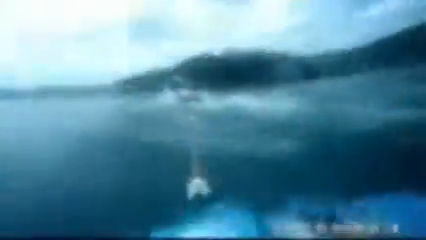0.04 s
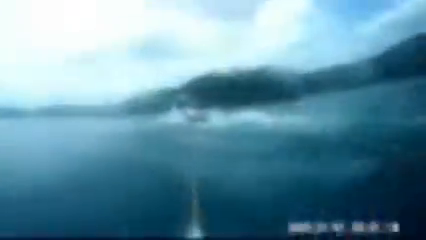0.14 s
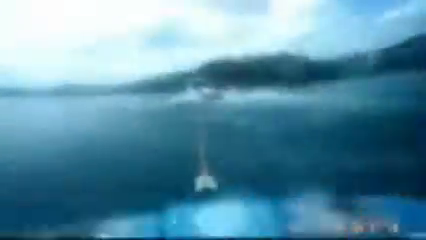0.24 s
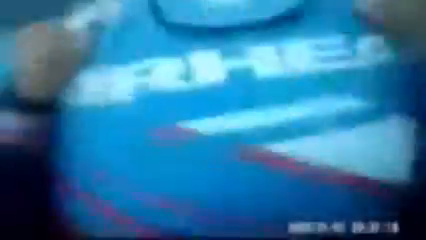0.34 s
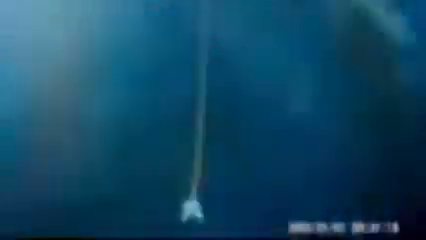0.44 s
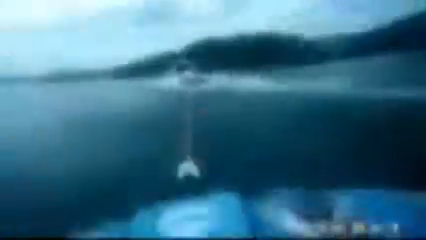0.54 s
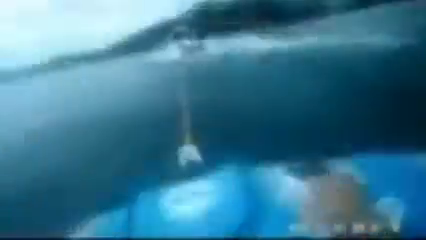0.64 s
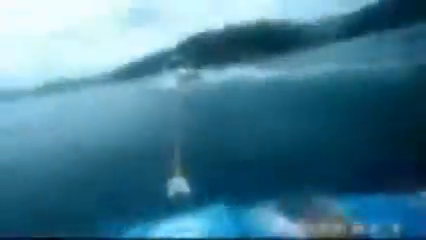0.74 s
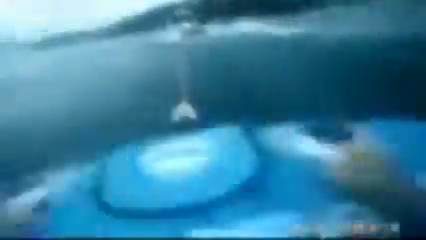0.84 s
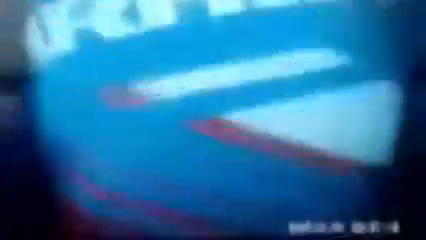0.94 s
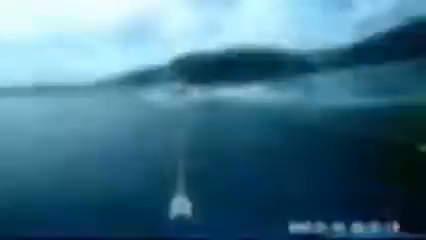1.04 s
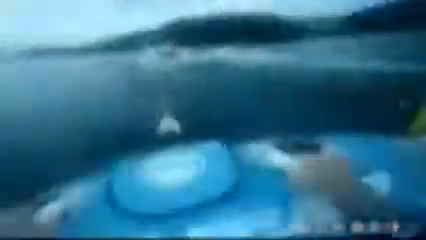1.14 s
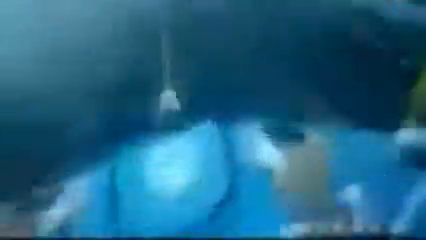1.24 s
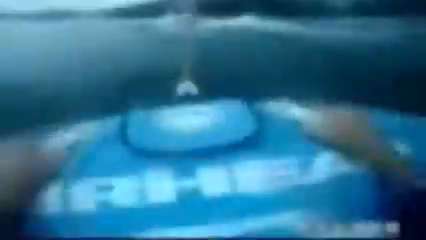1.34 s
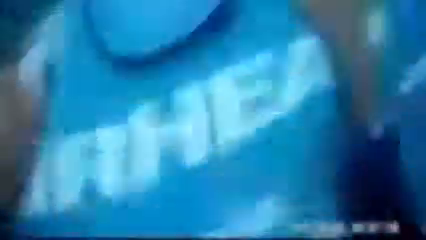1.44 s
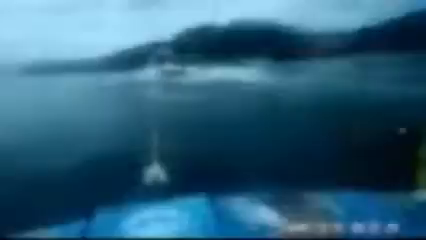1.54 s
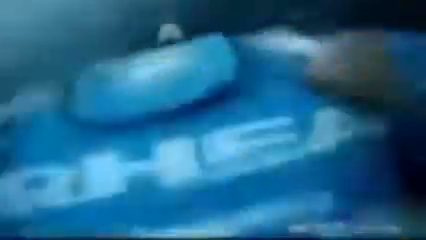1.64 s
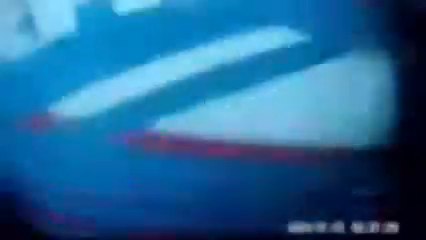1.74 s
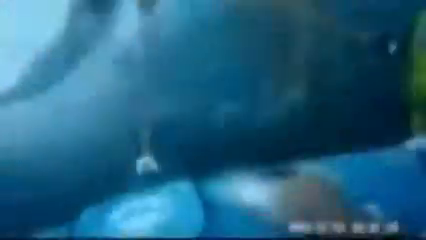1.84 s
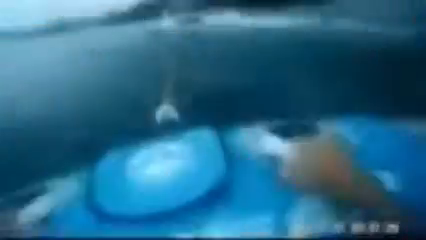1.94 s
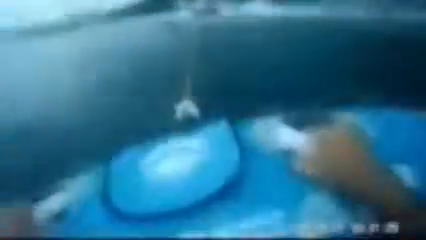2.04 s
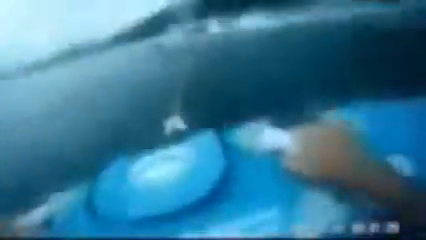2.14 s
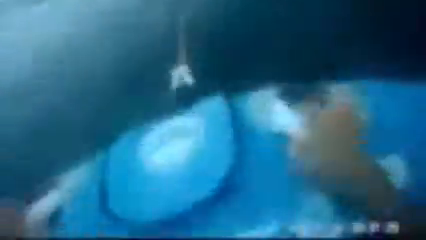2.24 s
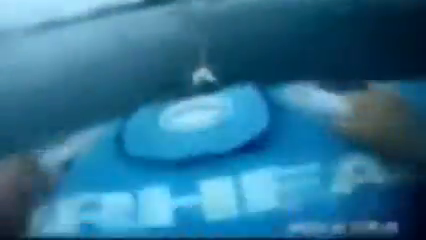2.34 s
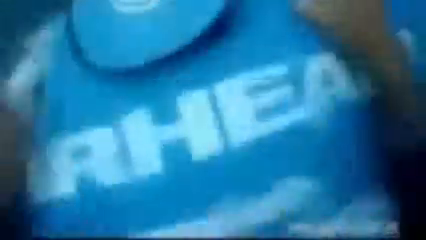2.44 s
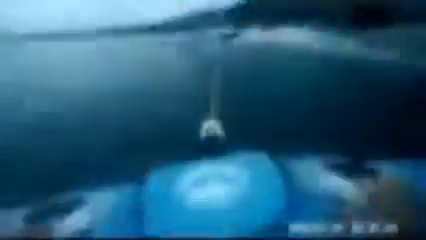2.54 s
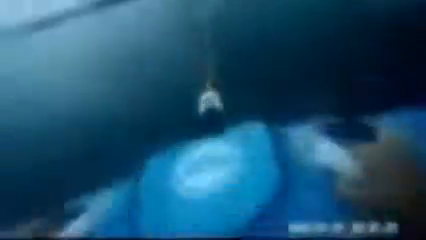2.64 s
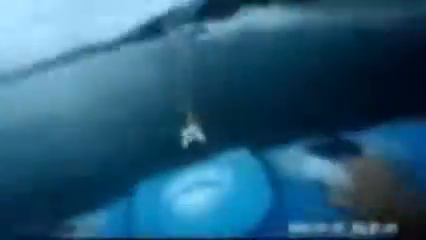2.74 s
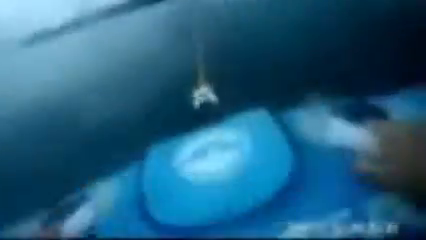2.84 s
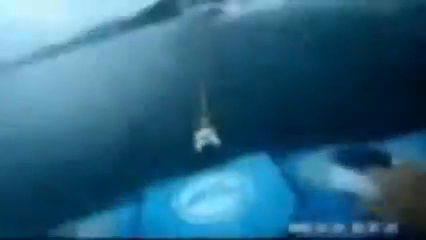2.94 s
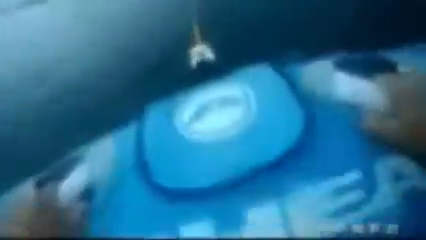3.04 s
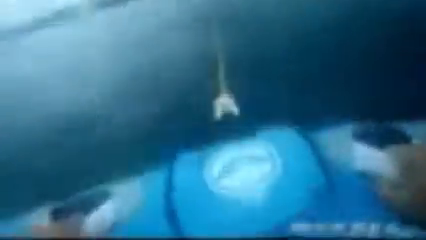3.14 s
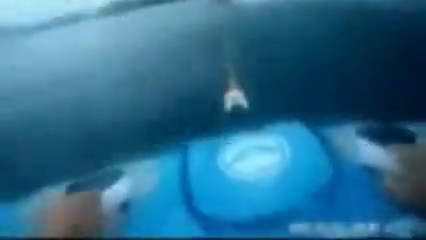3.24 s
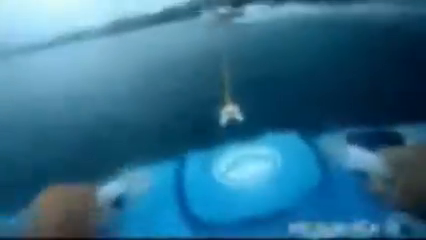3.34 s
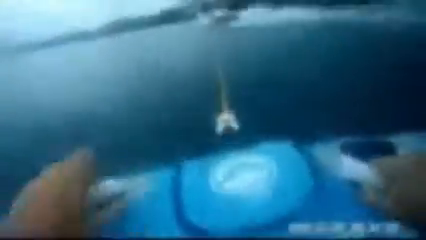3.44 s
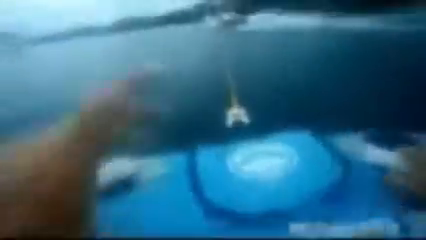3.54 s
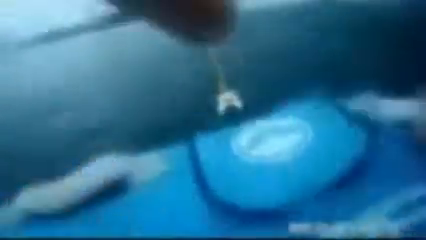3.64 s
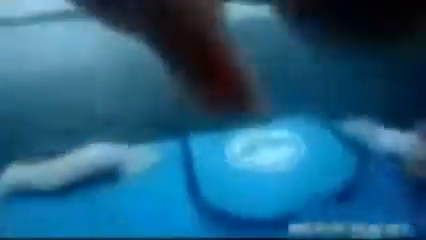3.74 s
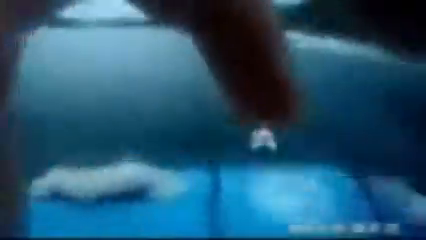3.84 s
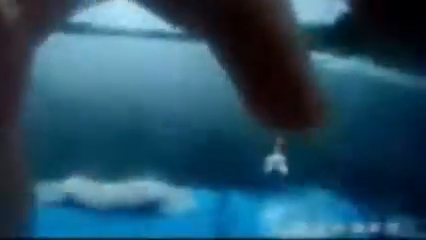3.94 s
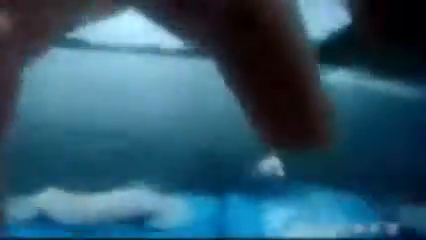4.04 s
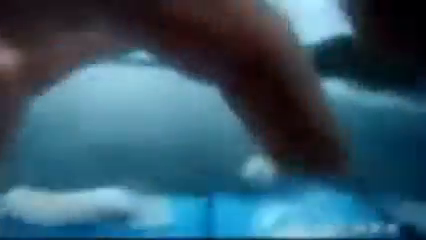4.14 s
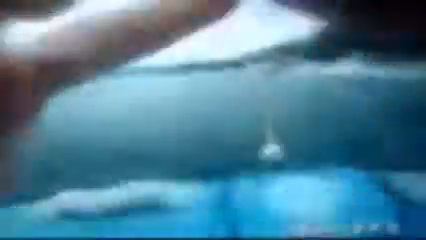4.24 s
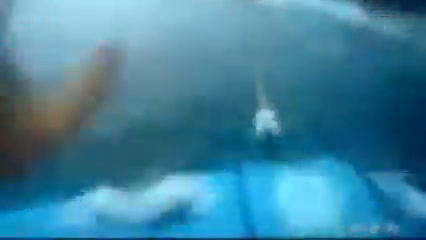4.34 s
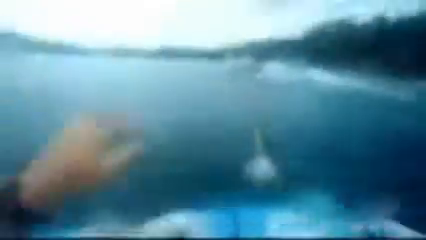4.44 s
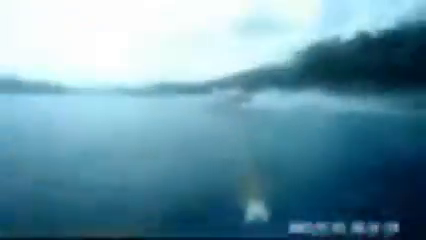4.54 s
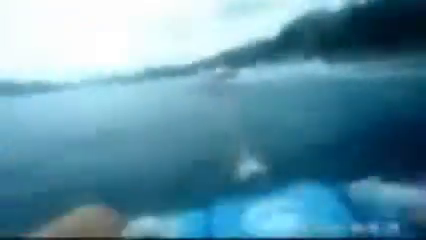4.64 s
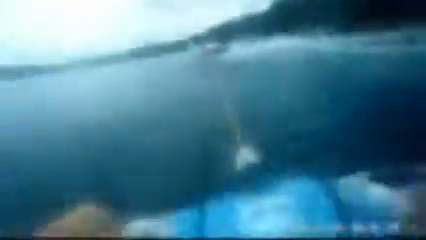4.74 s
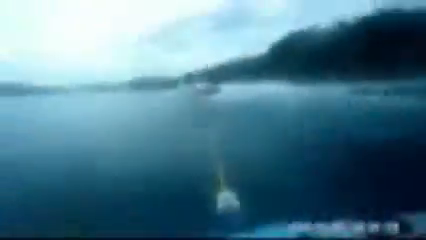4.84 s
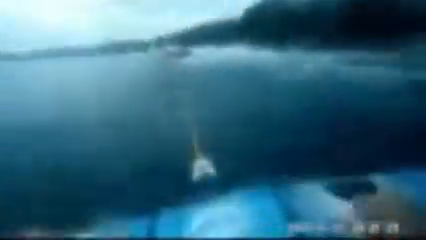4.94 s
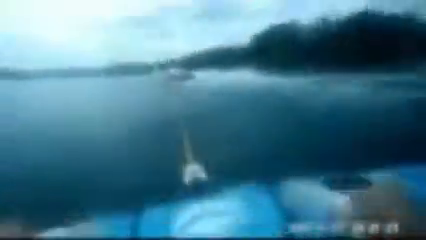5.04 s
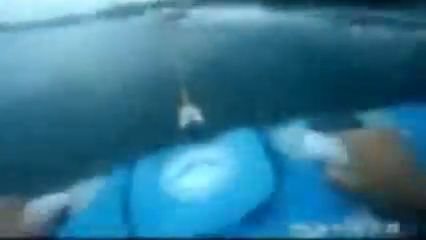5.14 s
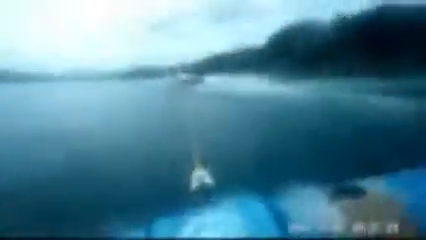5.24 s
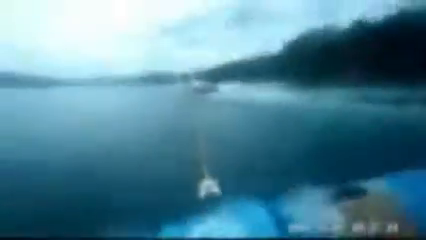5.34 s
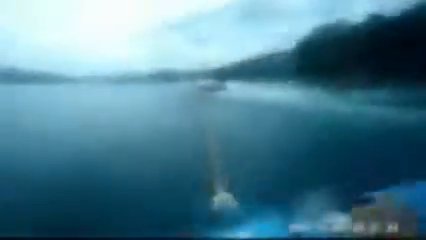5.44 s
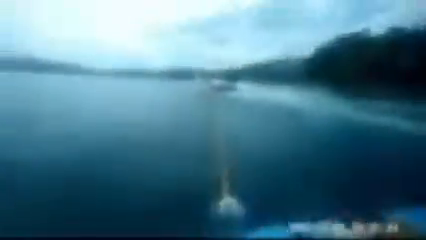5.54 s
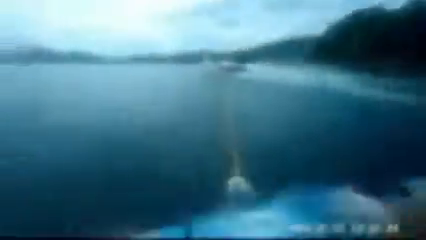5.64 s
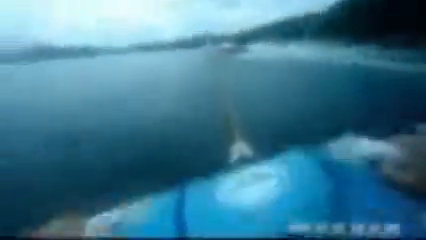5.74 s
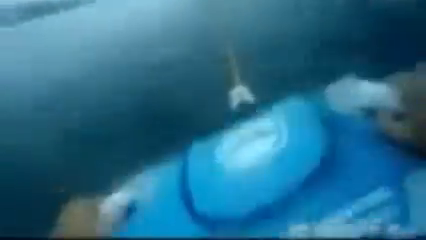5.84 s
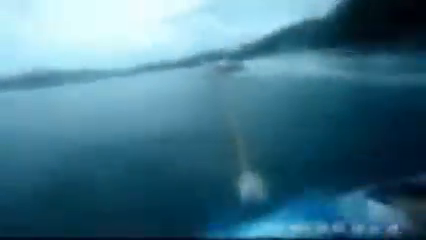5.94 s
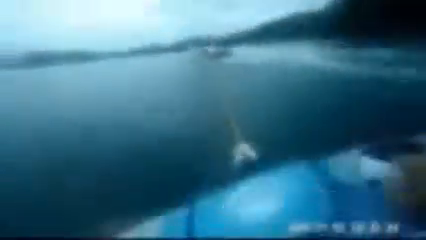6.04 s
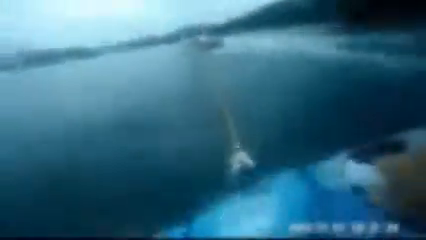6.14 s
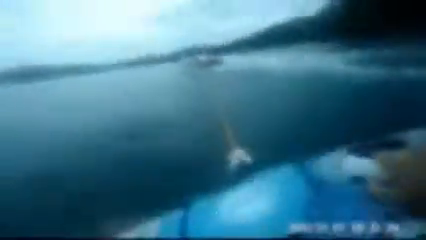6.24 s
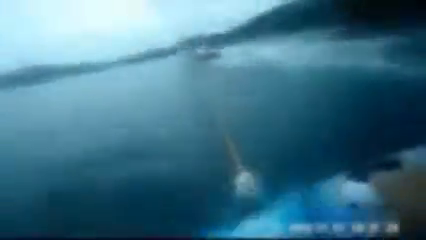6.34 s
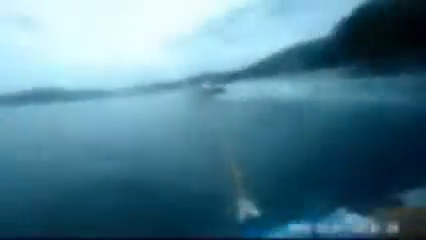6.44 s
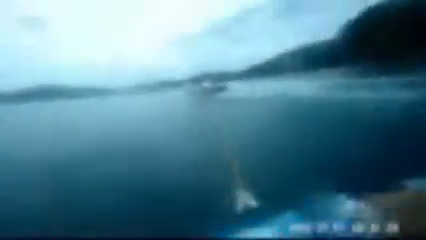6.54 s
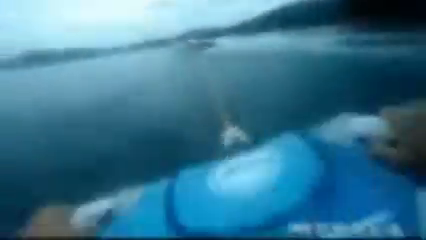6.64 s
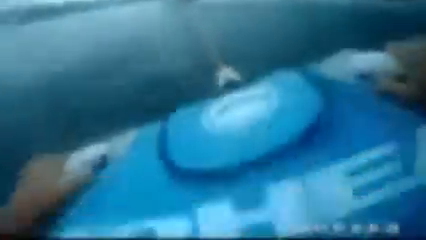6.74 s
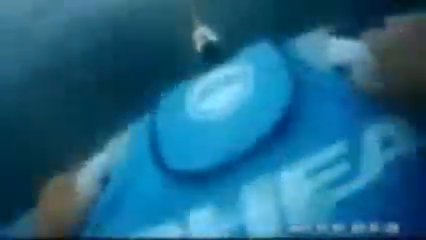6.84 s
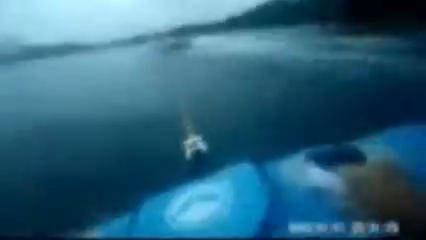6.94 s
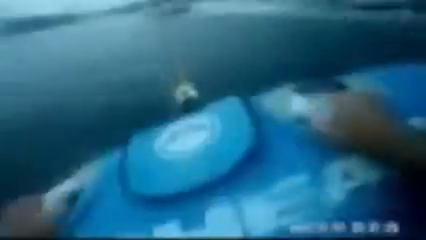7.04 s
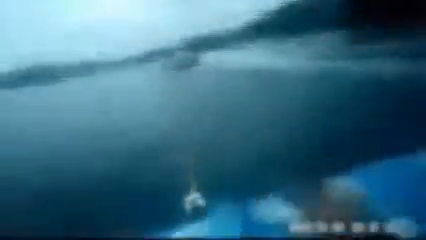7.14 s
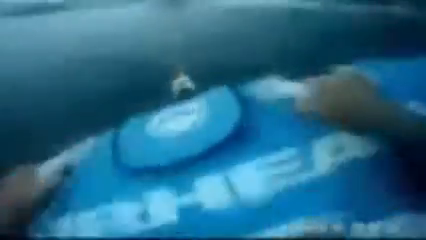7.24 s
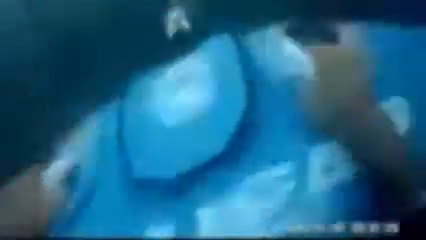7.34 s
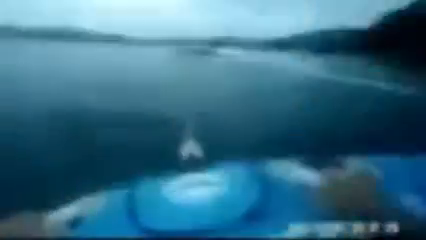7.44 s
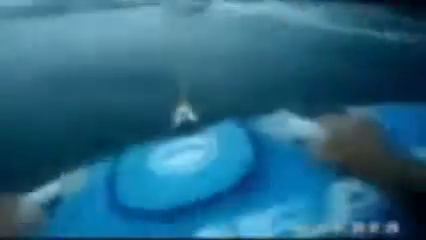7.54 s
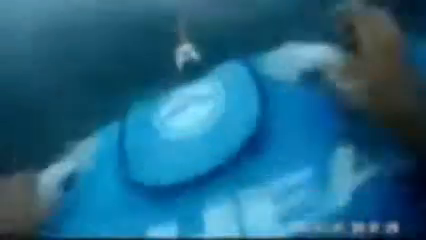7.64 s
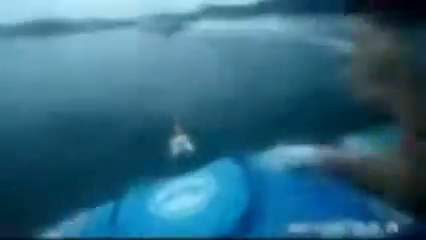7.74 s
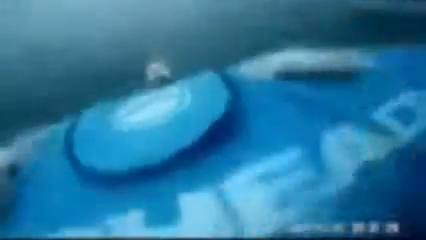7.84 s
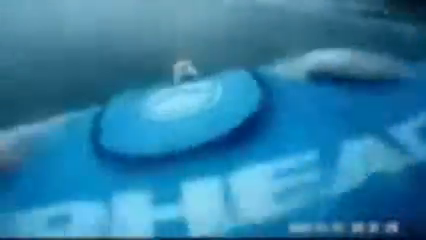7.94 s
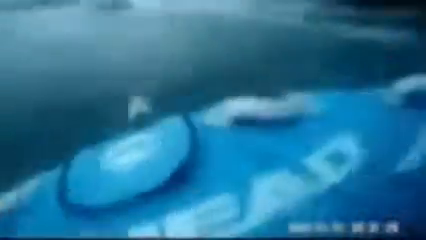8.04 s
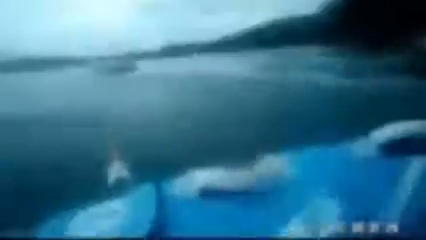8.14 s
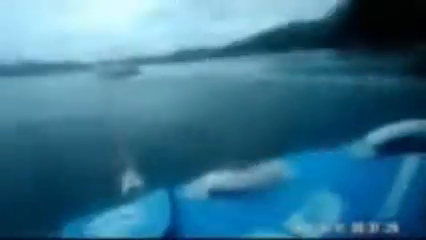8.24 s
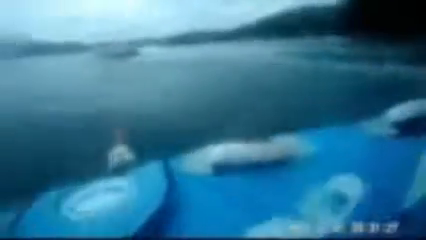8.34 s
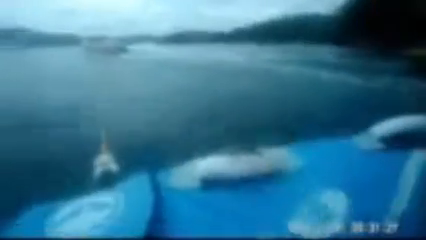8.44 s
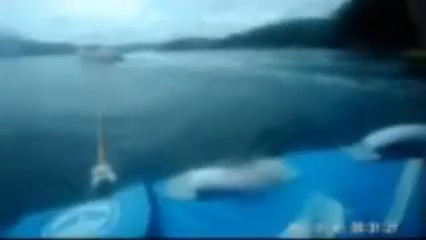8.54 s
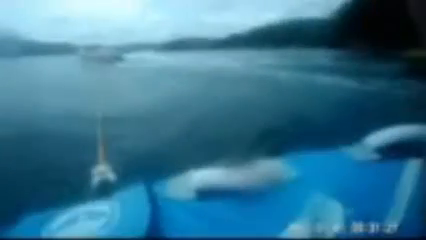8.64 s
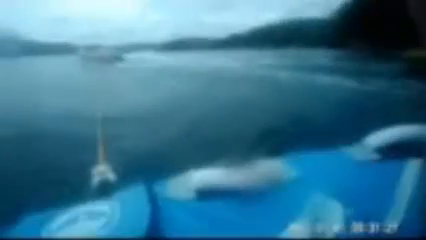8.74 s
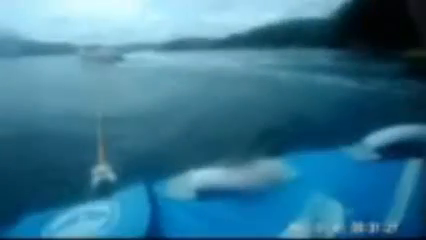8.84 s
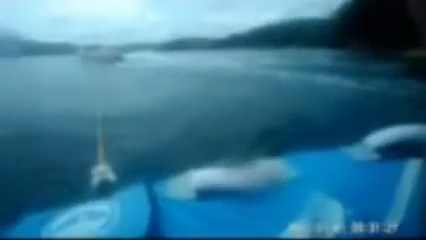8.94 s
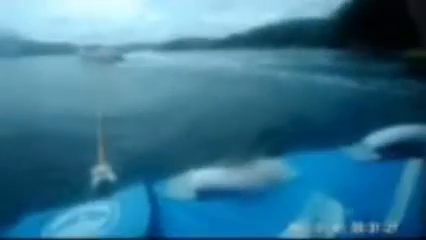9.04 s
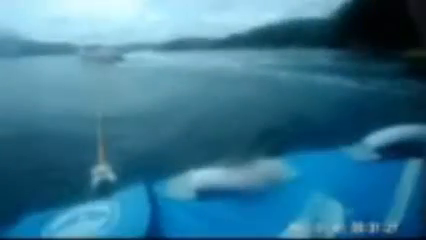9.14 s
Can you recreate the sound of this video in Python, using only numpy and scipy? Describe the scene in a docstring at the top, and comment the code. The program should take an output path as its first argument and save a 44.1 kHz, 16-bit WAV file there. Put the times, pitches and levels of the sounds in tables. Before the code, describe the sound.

Very close, boxy and muffled sound: water rushes dully beneath a tube with a low boat hum and faint spray hiss. Sharp landings thud, crack and overload the microphone, rattling its plastic case. They are dense and fierce early, pause, return in a tight burst, then give way to hand rubs, low buffeting and sparse soft thumps. Late knocks and scrapes end in a sudden cutoff.

```python
"""A towed inflatable tube skips over chop, heard from a camera riding on it in a sealed plastic housing.
Each landing presses on the microphone and rattles the camera; knocks ring the modes of tube and housing.
Hands and spray rub the housing in noisy strokes. Behind them, filtered noise makes water rush under
the tube, with a low boat engine hum in it, spray hissing above and buffeting below.
The loud blows overload the preamp."""
import sys
import numpy as np
from scipy import signal
from scipy.fft import rfft, irfft, next_fast_len
from scipy.io import wavfile
from scipy.ndimage import uniform_filter1d, map_coordinates

SR = 44100
rng = np.random.default_rng(int(sys.argv[2]) if len(sys.argv) > 2 else 0)


def amplitude_ratio(level_db):
    """Convert a level in decibels to the matching linear amplitude (field) ratio."""
    exponent = np.asarray(level_db, float) / 20
    return 10 ** exponent


def log_audio(samples):
    """Write samples as a 16-bit WAV file to the path given in sys.argv[1]."""
    # one column per channel
    frames = np.atleast_2d(samples).T
    # limit to full scale, then quantise
    limited = np.clip(frames, -1, 1)
    pcm = np.round(limited * 32767).astype(np.int16)
    wavfile.write(sys.argv[1], SR, pcm)


N = 405279  # length in samples

# A low boat engine hum at 155 Hz, then the modes of tube and housing.
# Each row: frequency in Hz, nominal width in Hz, relative level in dB.
HUM_AND_MODES = [(155, 10, -2), (295, 75, -.5), (430, 110, -12), (737, 34, -1), (1340, 150, -3.5),
                 (1740, 200, -13), (2420, 160, -24)]
# Landings as pressure dips. Each row: time in seconds, depth in dB, width in ms.
LANDING_DIPS = [(0.2838, 19.5, 3.27), (0.3277, -3, 5.7), (.544, -20, 13), (.855, 35, 3.2), (.901, -5, 3.7),
                (1.107, 9.5, 4.35), (1.3202, 11.5, 4.45), (1.3702, -12, 5.2), (1.6677, 23, 3.73),
                (1.721, -9, 3.9), (2.1072, 5.5, 6.5), (2.1384, -9, 2.3), (2.3467, 7.5, 3.6),
                (2.5486, -21, 21), (2.772, -18.5, 6.4), (3.4376, -11, 6.7), (3.451, -8, 5.7),
                (3.479, -9.5, 6.2), (3.6603, -16.5, 5.6), (3.982, -14.5, 4.4), (4.0073, -14, 3.9),
                (4.029, -11, 5.1), (4.0718, -10.5, 6), (4.2015, -13.5, 4.7), (4.628, -24, 10.5),
                (5.038, -10, 6.1), (5.749, -12, 6), (6.183, -16.5, 13), (6.974, -18.5, 11),
                (7.2136, 2, 4.5), (7.7326, -25, 17), (7.7805, -14.5, 3.1), (7.9526, -9.5, 2)]
# Spectrum of spray on the housing. Each row: frequency in Hz, gain in dB per Hz.
SPRAY_SPECTRUM = [(1500, -120), (2200, -1), (3000, -5), (4500, -7.5), (5300, -2.5), (6300, -8),
                  (7800, -17.5), (11000, -19)]
TRAVEL_DB = 3.5  # where the diaphragm runs out of travel


def unit(x):
    """Scaled to rms 1."""
    return x / np.sqrt(np.mean(x ** 2) + 1e-20)


def along(points, hz):
    """Gain of (Hz, dB) points on a log axis."""
    f, db = np.transpose(points)
    return amplitude_ratio(np.interp(np.log(hz + 1), np.log(f + 1), db))


def wobble(rate):
    """A smooth random curve, rate knots a second."""
    knots = rng.standard_normal(int(N * rate / SR) + 4)
    return map_coordinates(knots, [np.arange(N) * rate / SR])


def filtered(x, response):
    """x times a complex response of frequency, padded so that it can ring on."""
    m = next_fast_len(x.shape[-1] + 8192)
    spectrum = rfft(x, m) * response(np.fft.rfftfreq(m, 1 / SR))
    return irfft(spectrum, m)[..., :x.shape[-1]]


def modes(rows):
    """Causal response of (Hz, width in Hz, dB) resonances, alternating in sign."""
    def response(f):
        return sum((-1) ** k * amplitude_ratio(db) * 1j * f * width / (hz * hz - f * f + 1j * f * width)
                   for k, (hz, width, db) in enumerate(rows))
    return response


def table(*columns):
    """Columns of any matching shape as event rows."""
    return np.reshape(np.broadcast_arrays(*columns), (len(columns), -1)).T


def placed(s, sounds, offsets):
    """Sums the rows of sounds at their times s in seconds, offsets in samples."""
    at = np.round(s * SR).astype(int) + offsets
    return np.bincount(at.ravel(), sounds.ravel(), N)[:N]


def landings():
    """A swell, then a sharp dip; the pressure vent lets the diaphragm rebound and swing out."""
    swell = 0.94  # before the dip, as a share of its depth
    rebound_ms, rebound_db, rebound_top_db = 30, -7, -22.5  # delay, level against the dip, upper limit
    vent_hz, vent_damping = 27, 1.05
    s, depth_db, width_ms = np.transpose(LANDING_DIPS)[:, :, None]
    k = np.arange(-2048, 2048)
    u = k / SR * 1000 / width_ms  # time in dip widths
    shape = swell * np.exp(-2.5 * (u + 1.126) ** 2) - np.exp(-2.8 * u ** 2)
    # the tube settles with a second, small dip
    second_db = np.minimum(depth_db + rebound_db, rebound_top_db)
    rebound = amplitude_ratio(second_db) * np.exp(-1.5 * (u - rebound_ms / width_ms) ** 2)
    push = placed(s, amplitude_ratio(depth_db) * shape - rebound, k)
    travel = amplitude_ratio(TRAVEL_DB)
    push = travel * np.tanh(push / travel)
    return filtered(push, lambda f: -f * f / (vent_hz ** 2 - f * f + 1j * f * vent_hz * vent_damping))


def rattles(count=3):
    """Each landing rattles the camera in its mount: knock rows, louder and harder for deeper landings."""
    from_ms, to_ms = -21, 9.4  # span of the ticks around the dip
    s, depth_db, width_ms = np.transpose(LANDING_DIPS)[:, :, None]
    shake_db = np.minimum(depth_db, TRAVEL_DB)
    tick = np.arange(count)
    when, softer, aim = rng.random((len(s), 3, count)).transpose(1, 0, 2)
    at = s + (from_ms + (to_ms - from_ms) * (tick + when) / count) / 1000
    # each rattle starts dull and builds up
    strength_db = shake_db - 21.5 + 4.5 * tick - 6 * softer
    hardness = 0.23 + 0.1138 * shake_db + 0.072 * tick
    contact_ms = 0.68 * width_ms
    return table(at, strength_db, contact_ms, .16 + 0.206 * aim, hardness)


def knocks():
    """Each contact is a first blow and a chatter of ticks that ring tube, wall, wet vinyl and a crack."""
    # Knocks and smacks. Each row: start in seconds, strength in dB, contact in ms,
    # aim from 0 (tube) to 1 (housing wall), hardness from 0 to 1.
    knock_rows = [(.0722, -2, 3.8, 0.68, 0.56), (.2661, -16, 7.6, .25, 0.7), (.2865, 6.5, 4.6, .05, 0.61),
                  (.33, -18, 4.5, 0.45, 0.82), (.713, -16, 27, 0.17, 0.15), (.7415, -5.5, 4.6, .55, 0.62),
                  (.816, -15.5, 0.95, 0.51, 0.47), (.827, -1, 7.6, 0.56, 0.62), (.854, -17, 4.7, .7, 1),
                  (.8593, -4, 4.4, 0.15, 0.66), (.905, -13, 2.9, .45, 0.75),
                  (1.0766, -17.5, 3.1, 0.13, 0.65), (1.1, -7, 7.8, .15, .65), (1.145, -1, 5, 0.67, 0.7),
                  (1.3008, -15.5, 4.4, .1, 0.66), (1.317, -7.5, 4.1, .3, 0.73), (1.3247, -2, 9, 0.51, 0.57),
                  (1.368, -30, 2.2, .35, 0.98), (1.41, -18, 18, 0.6, 0.42), (1.549, -10.5, 4.4, 0.41, 0.67),
                  (1.574, -16, 2.6, 0.48, 0.4), (1.617, -5, 4.8, 0.59, 0.67), (1.632, -6, 6.6, 0.38, 0.56),
                  (1.671, -6.5, 6.2, .05, 0.67), (1.769, -16, 4.5, 0.52, 0.39), (2.078, -16, 2, .15, 0.06),
                  (2.1002, -12.5, 7.4, 0.18, 0.74), (2.121, -5, 2.3, 0.42, 0.46),
                  (2.142, 3, 7.6, .35, 0.69), (2.316, -18, 5, .15, 0.55), (2.342, -15.5, 4.9, .05, 0.9),
                  (2.38, -0.5, 5.8, 0.53, 0.65), (2.934, -22, 0.44, .2, 0.02),
                  (3.4141, -8.5, 27, 0.48, 0.65), (3.426, -1.5, 10, 0.47, 0.53),
                  (3.437, -1, 7.7, 0.39, 0.68), (3.451, -7.5, 3.1, 0.34, 0.63), (3.458, -14, 3, 0.47, 0.88),
                  (3.467, -9.5, 6, 0.31, 0.54), (3.9, -27.5, 5, .4, 0.8), (4.0, -21.5, 3, 0.19, 0.7),
                  (4.015, -29, 0.4, 0.44, 1), (4.052, -20, 10, 0.33, 0.83), (4.072, -17, 3.6, 0.52, 0.71),
                  (4.096, -20, 0.97, 0.41, .45), (4.182, -16.5, 1.6, 0.22, 0), (4.995, -27.5, 16, .1, .15),
                  (5.025, -20.5, 5.3, .1, 0), (5.707, -24, 28, .1, 0.22), (6.145, -23.5, 19, .1, 0.24),
                  (6.848, -27, 2, .5, .45), (7.041, -8.5, 4.1, 0.39, 0.62), (7.089, -12, 0.62, 0.42, 0.36),
                  (7.187, -10.5, 1.5, 0.38, 0.08), (7.209, -15.5, 8, .05, 0.78),
                  (7.269, 0, 3.96, 0.52, 0.59), (7.662, -8.5, 4.9, .05, 0.61), (7.685, -18, 4.4, 0.21, 0.5),
                  (7.839, -19.5, 2.6, 0.14, 0.36), (7.868, -24, 4, .2, 0.1),
                  (7.905, -15.5, 4.8, 0.56, 0.77), (7.938, -17.5, 4, .5, 0.72),
                  (7.947, -14, 2.6, .45, 0.67), (8.02, -18.5, 5.7, .15, 0.4), (8.094, -18, 6.4, .5, 0.96),
                  (8.099, -16.5, 2, 0.37, 0.55), (8.123, -19, 1.2, 0.56, 0.69)]
    # Resonances of the crack. Each row: frequency in Hz, width in Hz, level in dB.
    crack_modes = [(3060, 2730, 19.5), (4040, 2490, 21.5), (6520, 3500, -34.5)]
    missed_db = 30  # the part that a knock misses altogether rings this much weaker
    clack_span_db, crack_span_db = 51, 76  # per unit of hardness
    clack_tops = .68  # harder than this only the crack grows
    upper_span_db = 15.5  # soft knocks favour the lower tube mode
    slap_hz, slap_width_hz = 640, 300  # the dull slap of wet vinyl
    damped = [1.7, 1.2, 0.89, 3.4, 2.7]  # widths under a blow, against the nominal ones

    s, strength_db, contact_ms, aim, hardness = np.vstack([knock_rows, rattles()]).T[:, :, None]
    tube_db = strength_db - missed_db * np.maximum(2 * aim - 1, 0)
    wall_db = strength_db - 2 - missed_db * np.maximum(1 - 2 * aim, 0)
    clack_db = strength_db + clack_span_db * (np.minimum(hardness, clack_tops) - .5)
    crack_db = 1.594 * strength_db + crack_span_db * (hardness - .5) - 7.5
    slap_db = np.minimum(tube_db, clack_db) + 7.5

    ms = np.arange(4096) / SR * 1000
    ticks = rng.standard_normal((len(s), len(ms)))
    chatter = .2 * ticks * abs(ticks) * np.exp(-(ms / contact_ms) ** 4)
    first_blow = -np.exp(-ms / .09)
    droplets = 0.016 * ticks ** 3 * np.exp(-ms / 9)  # patter on after a short contact
    blows = chatter + first_blow + droplets

    def soft(hz, width):
        """One mode struck through a yielding contact, which dulls it above the mode."""
        return lambda f: modes([(hz, width, 0)])(f) / (1 + 1j * f / (1.69 * hz)) ** 3

    # the 155 Hz engine hum sounds only in the rush; the five lowest modes are struck
    rings = [filtered(blows, soft(hz, width * d)) for (hz, width, _), d in zip(HUM_AND_MODES[1:], damped)]
    rings.append(filtered(blows, soft(slap_hz, slap_width_hz)))
    rings.append(filtered(blows * (.05 + np.exp(-ms / contact_ms)), modes(crack_modes)))
    # the balance within tube and clack varies from knock to knock
    tube_spread_db, clack_spread_db = 2.5 * rng.standard_normal((len(s), 2)).T[:, :, None]
    lower_db = tube_db - tube_spread_db
    upper_db = tube_db + tube_spread_db + 3.5 + upper_span_db * np.minimum(hardness - .5, 0)
    high_clack_db = clack_db + clack_spread_db - 15
    levels_db = [lower_db, upper_db, wall_db, clack_db, high_clack_db, slap_db, crack_db]
    # each ring is brought to peak 1 before its level
    sound = sum(amplitude_ratio(db) * ring / abs(ring).max(axis=1, keepdims=True)
                for db, ring in zip(levels_db, rings))
    return placed(s, sound, np.arange(len(ms)))


def rubs():
    """Each stroke swells, scrapes unevenly and stops; it also stirs the modes of tube and housing."""
    # Hands and spray sliding over the housing. Each row: start in seconds, end in seconds, level in dB.
    rub_strokes = [(3.517, 3.734, -35.5), (3.732, 3.96, -41), (3.96, 4.124, -42), (4.374, 4.521, -44.5),
                   (6.503, 6.672, -44.5), (7.648, 7.734, -37), (7.756, 7.905, -43), (7.897, 7.997, -37),
                   (8.074, 8.184, -40)]
    rise, stop_s = .4, .03  # rise as a share of the stroke, fall in seconds
    t = np.arange(N) / SR
    stroke = np.zeros(N)
    for start, end, db in rub_strokes:
        swelling = (t - start) / (rise * (end - start))
        stopping = (end - t) / stop_s
        stroke += amplitude_ratio(db) * np.clip(np.minimum(swelling, stopping), 0, 1)
    grit = rng.standard_normal(N) * amplitude_ratio(2.2 * wobble(70) + .7 * wobble(18))
    scrape = unit(filtered(grit, lambda hz: along(SPRAY_SPECTRUM, hz)))
    stirred = unit(filtered(grit, modes(HUM_AND_MODES[1:])))
    return stroke * (scrape + amplitude_ratio(8.0) * stirred)


def water():
    """Uneven noise rings the modes and forms the engine hum over a broad wash, with spray and buffeting."""
    # Flow under the tube. Each row: time in seconds, rush level in dB, buffeting level in dB.
    flow_levels = [(0, -30.5, -33), (1.9, -33.5, -33.5), (2.599, -33, -35), (3.2, -36, -58),
                   (3.6, -31.5, -43), (4.1, -30, -25.5), (4.5, -33.5, -45), (5.4, -36, -47),
                   (6.3, -37, -48.5), (6.9, -33.5, -41), (7.5, -36, -42), (7.8, -32.5, -25),
                   (8.3, -32.5, -32.5)]
    # Spectra of wash and buffeting. Each row: frequency in Hz, gain in dB per Hz.
    wash_spectrum = [(60, -120), (100, -3), (250, -11), (500, -10.5), (1000, -11.5), (1600, -11.5),
                     (2600, -43.5), (3500, -120)]
    buffet_spectrum = [(12, -120), (22, -4), (36, 0), (70, -8), (120, -17), (200, -120)]
    s, *columns = np.transpose(flow_levels)
    rush_db, buffet_db = [np.interp(np.arange(N) / SR, s, column) for column in columns]
    # four noises, for hum and modes, wash, spray and buffeting, each wavering in level by its own dB
    noise = rng.standard_normal((4, N))
    wavering = np.array([wobble(rate) for rate in (25, 30, 25, 12)])
    noise *= amplitude_ratio([[1.5], [1.5], [.6], [3.5]] * wavering)

    def hollow(f):
        """The hum and the modes as resonances, each broadened and passed twice."""
        return sum(amplitude_ratio(db) * modes([(hz, 1.5 * width, 0)])(f) ** 2 for hz, width, db in HUM_AND_MODES)

    hum_and_ringing = unit(filtered(noise[0], hollow))
    wash = unit(filtered(noise[1], lambda hz: along(wash_spectrum, hz)))
    spray = unit(filtered(noise[2], lambda hz: along(SPRAY_SPECTRUM, hz)))
    buffeting = unit(filtered(noise[3], lambda hz: along(buffet_spectrum, hz)))
    rush = amplitude_ratio(rush_db) * (hum_and_ringing + amplitude_ratio(-1.5) * wash)
    hiss = amplitude_ratio(0.48 * rush_db - 32.0) * spray  # follows the rush at about half its dB
    return rush + hiss + amplitude_ratio(buffet_db) * buffeting


def scene():
    """Everything is summed at one microphone inside the housing."""
    return (landings() + knocks() + rubs() + water())[None]


def top_cut(x):
    """Nothing passes above the cut-off."""
    return signal.sosfilt(signal.butter(12, 16120, fs=SR, output="sos"), x)


def record(dry):
    """Gain control ducks after blows, the preamp clips, the band narrows, the sound stops short."""
    top_hz, blow_top_hz = 11400, 8600  # upper limit always; lower edge of the band that drops out
    stop_s = 8.329
    hold = np.exp(-1 / (.055 * SR))  # 55 ms
    load = signal.lfilter([1 - hold], [1, -hold], np.minimum(abs(dry), 1))
    ducked = dry / (1 + load / .07)
    # the blows themselves are too quick for the gain control
    loud = np.clip(uniform_filter1d(abs(dry), size=441) / .15, 0, 1)
    x = loud * dry + (1 - loud) * ducked
    x = x / (1 + abs(x / .96) ** 10) ** (1 / 10)  # preamp overload
    x = filtered(x, lambda hz: 1 / (1 + (hz / top_hz) ** 60))
    # the topmost band mostly drops out while it is strong, as in blows
    air = filtered(x, lambda hz: 1 / (1 + (blow_top_hz / (hz + 1)) ** 60))
    strong = 1. * (uniform_filter1d(abs(air), size=600) > .002)
    busy = uniform_filter1d(strong, size=200)
    x = np.clip(1.015 * (x - .88 * busy * air), -1, 1)
    return top_cut(x * (np.arange(N) < stop_s * SR))


dry = scene()
out = record(dry)
log_audio(out)
```